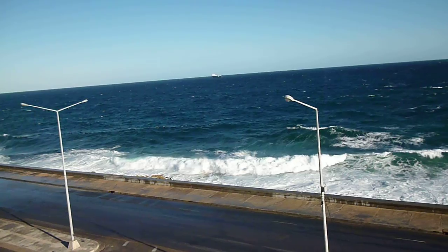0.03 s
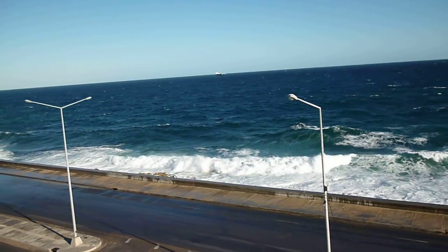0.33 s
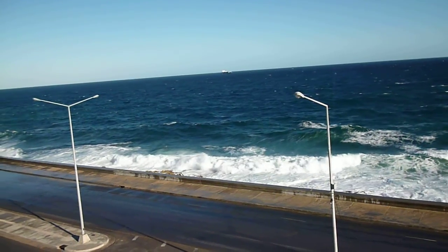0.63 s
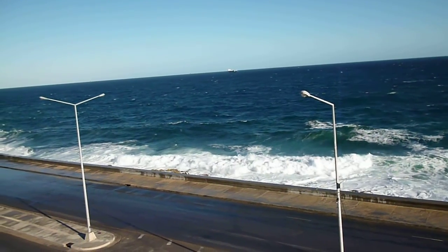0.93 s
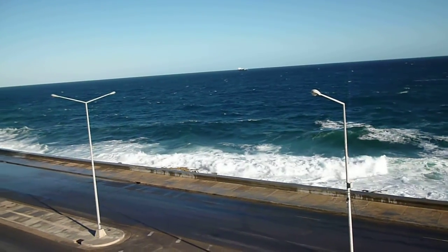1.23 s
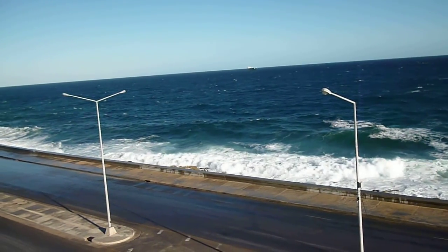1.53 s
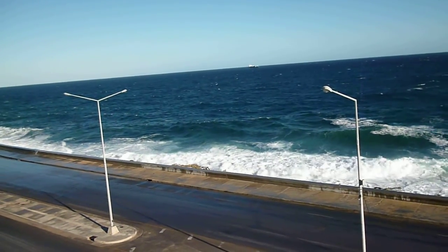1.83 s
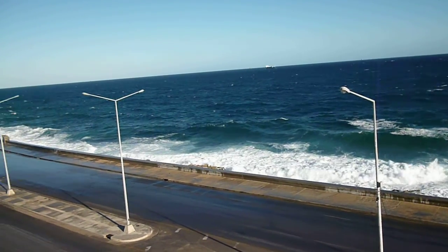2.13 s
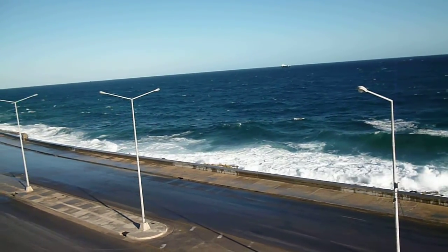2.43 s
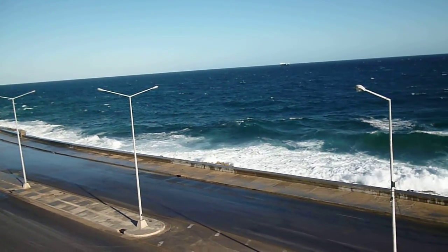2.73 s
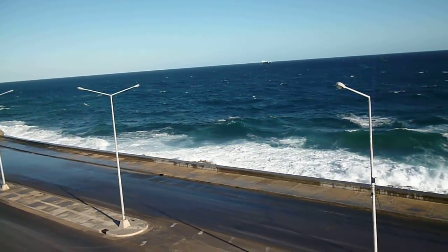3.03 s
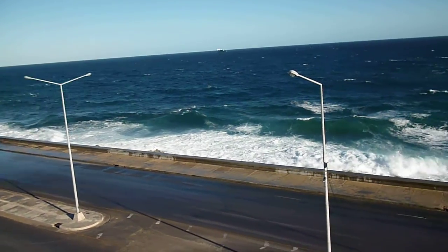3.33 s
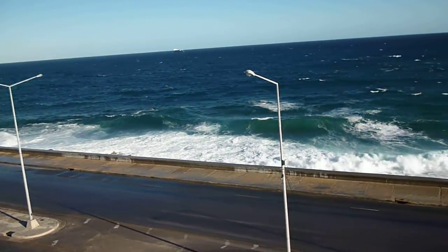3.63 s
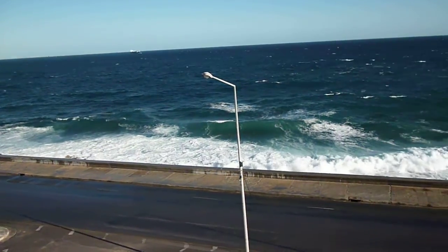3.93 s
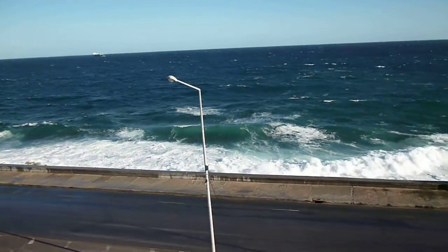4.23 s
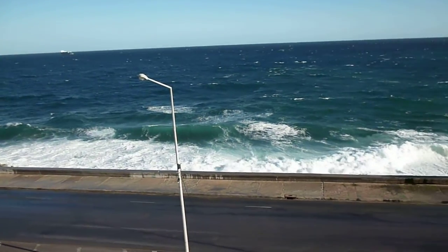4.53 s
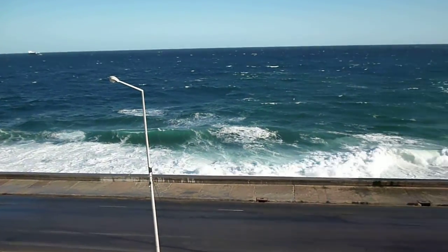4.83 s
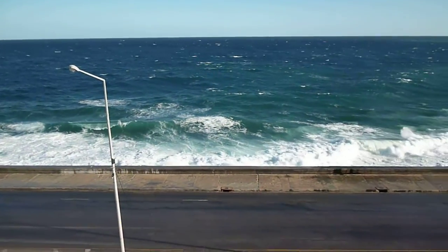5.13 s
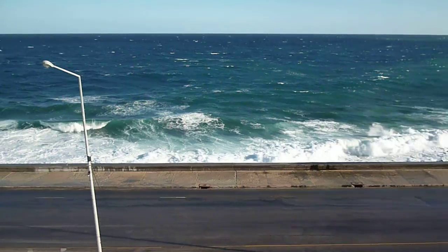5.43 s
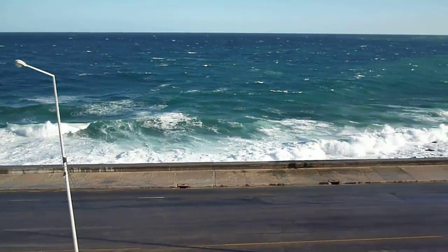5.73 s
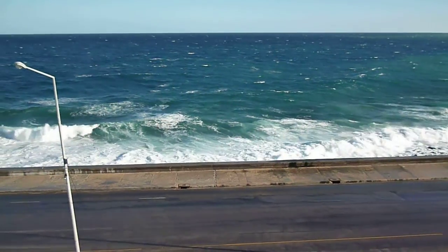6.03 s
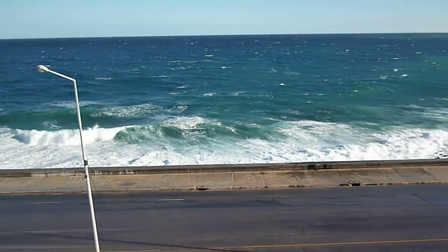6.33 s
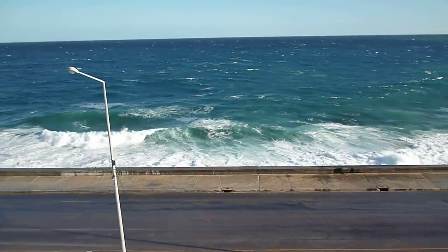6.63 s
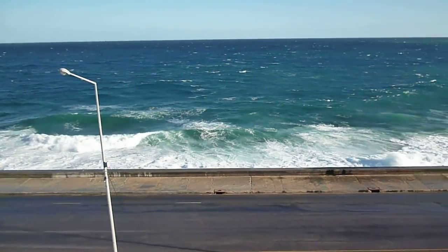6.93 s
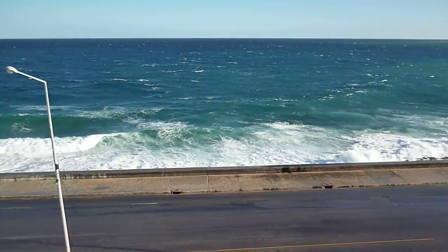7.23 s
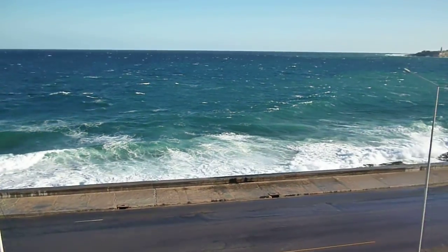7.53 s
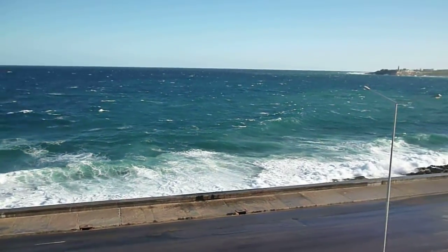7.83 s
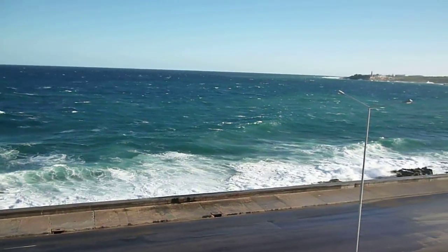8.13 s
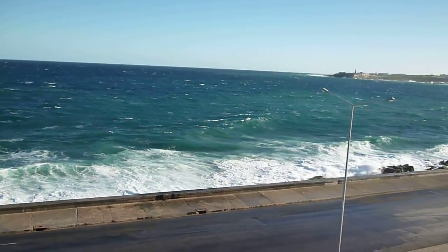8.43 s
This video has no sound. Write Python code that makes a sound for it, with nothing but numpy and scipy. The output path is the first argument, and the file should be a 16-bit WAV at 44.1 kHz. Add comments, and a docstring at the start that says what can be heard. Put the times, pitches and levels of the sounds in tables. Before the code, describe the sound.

Wind buffets a microphone high over the seafront, rumbling, fluttering and thumping in uneven gusts. Behind it, breaking waves merge into one continuous foamy roar that swells gently. The volume dips after the hardest blasts and slowly recovers. A little past halfway the wind slackens and the surf comes forward, until another run of strong gusts closes in.

```python
"""Storm surf runs in against a seawall, heard from high above a coastal road in a strong wind.
Countless bubbles in the breakers merge into one broad roar that swells as each wave comes in.
Gusts tumble over the microphone opening as a lumpy rumble, with single hard thumps on top.
A hard thump makes the recorder's automatic volume control turn the whole scene down at once;
the sound then creeps back up until the next one."""
import sys
import numpy as np
from scipy import signal
from scipy.fft import rfft, irfft, next_fast_len
from scipy.io import wavfile
from scipy.ndimage import uniform_filter1d, minimum_filter1d

SR = 44100
rng = np.random.default_rng(int(sys.argv[2]) if len(sys.argv) > 2 else 0)


def wav_record(signal):
    """Record a signal, one row per channel, as 16-bit PCM in the file named by sys.argv[1]."""
    frames = np.transpose(np.atleast_2d(signal))
    bounded = np.clip(frames, -1, 1)
    # unit amplitude maps onto the largest positive 16-bit level
    quanta = np.round(bounded * 32767).astype(np.int16)
    wavfile.write(sys.argv[1], SR, quanta)


N = 378378


def surf(gain_db=11, churn_db=1.3, spray_db=0.76):
    """Countless bubbles: big clouds of them roar and churn, fine spray hisses more evenly."""
    # the surf swells as waves break: (time [s], relative level [dB], extra weight of the roar [dB])
    swells = [(0, -34, 0), (0.2, -37.5, 0.5), (0.65, -33.5, -0.5), (1.0, -33.5, 1), (1.5, -37.5, 0.5),
              (2.55, -38, 0), (2.75, -36, -1), (3.25, -35, 0), (3.45, -36, 0), (4.35, -37.5, 1),
              (4.75, -35.5, -0.5), (5.25, -38, 1.5), (5.47, -36.5, -1), (5.7, -37.5, 1), (6.75, -37, -1.5),
              (7.05, -38, 1.5), (7.9, -37.5, 2.5), (8.15, -36, 1), (8.58, -36.5, -2)]
    # how strong each pitch is in the foaming water: (frequency [Hz], relative level [dB])
    foam_colour = [(40, 3), (170, -1.5), (400, -0.5), (500, -3.5), (610, -1), (850, -2), (1020, -5.5),
                   (1320, -5.5), (1580, -11), (1850, -10.5), (2300, -13.5), (4200, -19.5), (6700, -24),
                   (8000, -36), (8900, -51)]
    level_db, weight_db = in_time(swells)
    roar, hiss = split(coloured_noise(foam_colour), edge_hz=1300)
    boom, wash = split(roar, edge_hz=850)
    boom = boom * from_db(weight_db + churn_db * drift(8.1))
    wash = wash * from_db(weight_db + churn_db * drift(23))
    hiss = hiss * from_db(spray_db * drift(3.3))
    return from_db(level_db + gain_db) * (boom + wash + hiss)


def wind(rumble_db=0.92, flutter_db=0.8, rumble_lumps_db=3.0, flutter_lumps_db=4.0, puffs_db=0.86):
    """Large swirls of air rumble and small ones flutter; puffs and quicker lumps stir both together."""
    # share of the very largest swirls: (time [s], level of the deepest rumble [dB])
    swirl_depth = [(0, -7), (1.2, -12.5), (1.8, -1.5), (2.8, 5.5), (3.5, 3.5), (4.4, -1), (5.5, 4.5),
                   (6.5, 2.5), (7.2, 5.5), (8.58, 5)]
    # tone of the large, slow swirls: (frequency [Hz], relative level [dB])
    rumble_colour = [(15, -27), (25, -10.5), (35, -18), (55, -11), (90, -4), (140, 0.5), (200, -0.5),
                     (270, -4), (380, -17.5), (600, -33), (1500, -70.5)]
    # tone of the small, fast swirls: (frequency [Hz], relative level [dB])
    flutter_colour = [(80, -20.5), (200, -2.5), (280, -2.5), (390, 3), (500, -6.5), (700, -13),
                      (1100, -27.5), (2000, -38), (5000, -64)]
    large, small = wind_strength()
    depth_db, = in_time(swirl_depth)
    lumps = drift(67)
    puffs = from_db(puffs_db * drift(14))
    deep, body = split(coloured_noise(rumble_colour), edge_hz=110)
    rumble = from_db(depth_db) * deep + body
    rumble = evened(rumble * from_db(rumble_lumps_db * lumps), span_s=0.06)
    flutter = evened(coloured_noise(flutter_colour) * from_db(flutter_lumps_db * lumps), span_s=0.036)
    return puffs * (from_db(rumble_db) * large * rumble + from_db(flutter_db) * small * flutter)


def wind_strength(floor_flutter_db=-7.5):
    """Strength of the large and the small swirls: each gust adds its power to the background rumble."""
    # background rumble under the gusts, rising and falling, before the volume control:
    # (time [s], relative level [dB])
    rumble_floor = [(0, -20.5), (0.25, -21.5), (0.45, -25), (1.0, -25), (1.35, -28), (2.0, -26.5),
                    (2.6, -19), (2.95, -25.5), (3.5, -21.5), (4.15, -30.5), (4.7, -21.5), (5.1, -30.5),
                    (5.7, -27.5), (6.6, -27), (7.3, -26.5), (7.8, -23), (8.15, -14.5), (8.58, -19)]
    # gusts that swell and fade evenly:
    # (peak time [s], relative rumble level [dB], width [s], flutter compared with rumble [dB])
    gusts = [(0.05, -5, 0.11, 0), (0.584, -11.5, 0.063, -9), (0.656, -16.5, 0.05, -0.5),
             (0.816, -19.5, 0.047, -7.5), (1.246, -18.5, 0.13, -6), (1.432, -18, 0.072, -17),
             (1.535, -19, 0.15, -10), (1.792, -16.5, 0.09, -18), (1.865, -13.5, 0.085, -15.5),
             (2.06, -18, 0.15, -8.5), (2.209, -15.5, 0.066, -15.5), (2.344, -13, 0.06, -13),
             (2.556, -9, 0.075, -12), (2.663, -12, 0.04, -15), (2.754, -15, 0.11, -11),
             (2.879, -17, 0.052, -8), (3.081, -17, 0.078, -5.5), (3.238, -19.5, 0.1, -8),
             (3.366, -8, 0.065, -8.5), (3.485, -10.5, 0.059, -12.5), (3.679, -16, 0.12, -8),
             (3.807, -10, 0.024, -9), (3.974, -12, 0.17, -9), (4.079, -11, 0.07, -5.5),
             (4.233, -7.5, 0.11, -8), (4.341, -15, 0.09, 3.5), (4.538, -12.5, 0.1, -5),
             (4.832, -14.5, 0.055, -6), (4.921, -16.5, 0.12, -11.5), (5.119, -23.5, 0.059, -5),
             (5.541, -16, 0.045, -20), (6.122, -18.5, 0.09, -5), (6.385, -27.5, 0.14, -6.5),
             (6.65, -23, 0.046, -11), (6.778, -22, 0.053, -22), (7.069, -16, 0.044, -14.5),
             (7.163, -13, 0.096, -17.5), (7.296, -9, 0.069, -9), (7.398, -8.5, 0.033, -13.5),
             (7.641, -19, 0.054, -7), (7.993, -15.5, 0.066, -7.5), (8.219, -12, 0.061, -7),
             (8.31, -12.5, 0.05, -7), (8.538, -11.5, 0.032, 0.5)]
    t = np.arange(N) / SR
    floor_db, = in_time(rumble_floor)
    large_power = from_db(floor_db) ** 2
    small_power = from_db(floor_db + floor_flutter_db) ** 2
    for peak_s, peak_db, width_s, flutter_db in gusts:
        near = slice(*np.searchsorted(t, [peak_s - 2 * width_s, peak_s + 2 * width_s]))
        gust = from_db(peak_db) * np.exp(-2 * ((t[near] - peak_s) / width_s) ** 2)
        large_power[near] += gust ** 2
        small_power[near] += (gust * from_db(flutter_db)) ** 2
    return np.sqrt(large_power), np.sqrt(small_power)


def wind_thumps(air, level_db=-2.5, width_cycles=0.4, snap=0.31, calm_cycles=0.88):
    """A swirl hits the microphone opening: one quick pressure swing briefly replaces the wind noise."""
    # hard hits of air: (time [s], relative level [dB], centre frequency [Hz])
    hits = [(0.043, 8.5, 283), (0.061, 4.5, 595), (0.58, -0.5, 415), (0.643, -1, 362), (1.237, -2.5, 208),
            (1.51, -3, 170), (1.792, -3, 98), (1.854, 1.5, 298), (2, -2.5, 302), (2.189, -1.5, 145),
            (2.355, 2.5, 156), (2.534, 4.5, 340), (2.799, 3, 172), (3.358, 4, 362), (3.382, 3.5, 240),
            (3.472, 2.5, 154), (3.741, 3, 260), (3.813, -1.5, 597), (3.966, 5.5, 171), (4.045, 9.5, 255),
            (4.214, -3.5, 467), (4.314, 2, 368), (4.531, 5, 526), (5.541, -6, 272), (5.567, 0.5, 480),
            (6.104, 0, 306), (6.418, -1, 201), (6.893, -11, 250), (7.041, -5, 257), (7.067, 4.5, 368),
            (7.295, 6.5, 244), (7.398, 3, 322), (7.733, 2.5, 156), (7.889, 1.5, 218), (7.996, 3.5, 234),
            (8.066, 10, 368), (8.295, -1.5, 477), (8.349, 2.5, 442), (8.428, -1.5, 380), (8.541, -2, 358)]
    thumps, calm, t = np.zeros(N), np.ones(N), np.arange(N) / SR
    for (hit_s, peak_db, hz), phase in zip(hits, rng.uniform(0, 2 * np.pi, len(hits))):
        near = slice(max(int((hit_s - .04) * SR), 0), int((hit_s + .04) * SR))
        cycles = (t[near] - hit_s) * hz   # counted from the middle of the swing
        swing = np.exp(-.5 * (cycles / width_cycles) ** 2) * np.cos(2 * np.pi * cycles + phase)
        # a sharper kink in the middle: an octave up, half as long
        kink = np.exp(-.5 * (2 * cycles / width_cycles) ** 2) * np.cos(4 * np.pi * cycles + phase)
        thumps[near] += from_db(peak_db + level_db) * (swing + snap * kink)
        calm[near] *= 1 - np.exp(-.5 * (cycles / calm_cycles) ** 2)
    return calm * air + thumps


def volume_control(x, limit_db=-7, recovery_db_per_s=10, attack_s=0.008, start_cut_db=18):
    """Peaks over the limit pull the volume down at once; it climbs back at a steady rate."""
    envelope = np.abs(signal.hilbert(x, next_fast_len(N + SR)))[0, :N]   # outline of the peaks
    excess_db = np.maximum(20 * np.log10(envelope + 1e-9) - limit_db, 0)
    climb_db = recovery_db_per_s * np.arange(N) / SR
    held_db = np.maximum.accumulate(excess_db + climb_db)
    cut_db = np.maximum(held_db, start_cut_db) - climb_db   # starts turned down by earlier gusts
    size = max(int(attack_s * SR), 2)
    smooth_gain_db = uniform_filter1d(minimum_filter1d(-cut_db, size), size)
    return x * from_db(smooth_gain_db)


def rounded(x, ceiling=0.28):
    """Round off the strongest swings so that they stay under the ceiling."""
    return x / (1 + (x / ceiling) ** 4) ** (1 / 4)


def from_db(db):
    """Turn decibels into a factor to multiply by."""
    return 10 ** (np.asarray(db) / 20)


def rms_one(x):
    """Scale a signal so that its typical size (rms) is 1."""
    return x / np.sqrt(np.mean(x ** 2) + 1e-20)


def in_time(rows):
    """Join a table's points with straight lines: one curve for each column after the time."""
    times, *columns = np.transpose(rows)
    return [np.interp(np.arange(N) / SR, times, column) for column in columns]


def drift(rate_hz):
    """A random wobble of typical size 1 that changes about rate_hz times a second."""
    step, warm_up = 40, 2000   # samples per random value; values skipped while the filter settles
    pole = np.exp(-2 * np.pi * step * rate_hz / SR)
    noise = rng.standard_normal(N // step + warm_up + 2)
    slow = signal.lfilter([1], [1, -2 * pole, pole * pole], noise)[warm_up:]
    return np.interp(np.arange(N) / step, np.arange(len(slow)), rms_one(slow))


def coloured_noise(colour):
    """Noise of typical size 1 with the given balance of low and high pitches."""
    size = next_fast_len(N)
    hz, db = np.transpose(colour)
    bin_hz = np.maximum(np.arange(size // 2 + 1) * SR / size, 1)
    gain = from_db(np.interp(np.log(bin_hz), np.log(hz), db))
    spectrum = rfft(rng.standard_normal(size)) * gain
    return rms_one(irfft(spectrum, size)[:N])


def evened(x, span_s):
    """Hold the level steady over spans longer than span_s; faster lumps stay."""
    size = max(int(span_s * SR), 2)
    local_power = uniform_filter1d(uniform_filter1d(x ** 2, size), size)
    return x / np.sqrt(local_power + 1e-12)


def split(x, edge_hz):
    """The parts of a sound below and above edge_hz."""
    low = signal.sosfiltfilt(signal.butter(2, edge_hz, fs=SR, output="sos"), x)
    return low, x - low


def scene():
    """Distant surf and the wind right on the microphone, in one channel."""
    return (surf() + wind_thumps(wind()))[None]


def record(dry, low_cut_hz=42, notch_hz=4395, high_cut_hz=9500):
    """The recorder tames loud peaks, then loses the deepest bass, one narrow band and the top treble."""
    tamed = rounded(volume_control(dry))
    lean = signal.sosfilt(signal.butter(2, low_cut_hz, "high", fs=SR, output="sos"), tamed)
    notched = signal.lfilter(*signal.iirnotch(notch_hz, Q=50, fs=SR), lean)
    faded = notched * signal.windows.tukey(N, .001)   # tiny fades keep the ends from clicking
    return signal.sosfilt(signal.cheby2(16, 70, high_cut_hz, fs=SR, output="sos"), faded)


dry = scene()
out = record(dry)
wav_record(out)
```